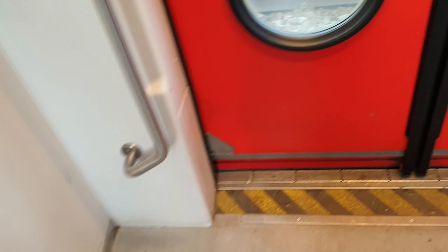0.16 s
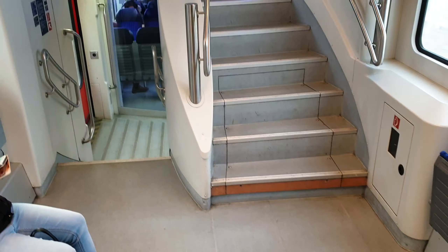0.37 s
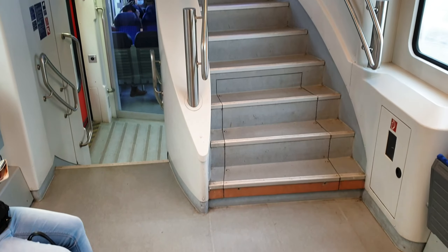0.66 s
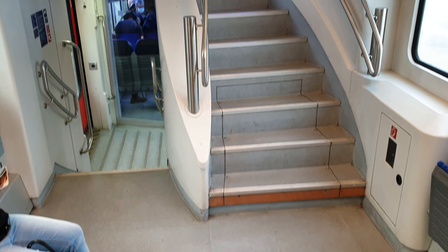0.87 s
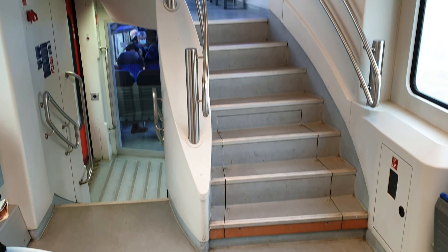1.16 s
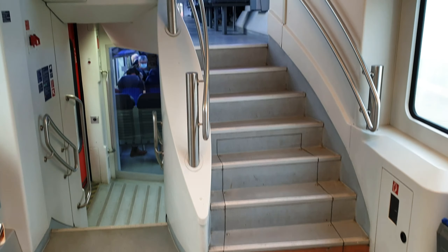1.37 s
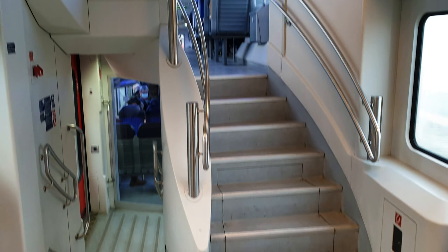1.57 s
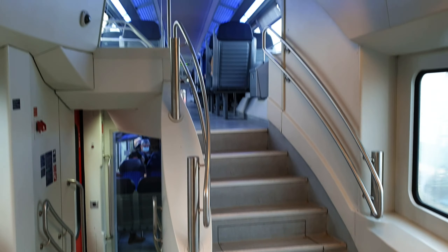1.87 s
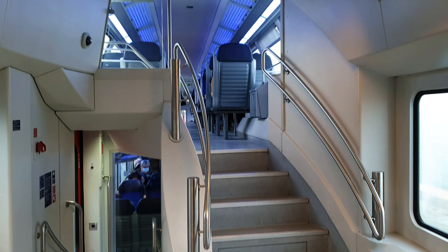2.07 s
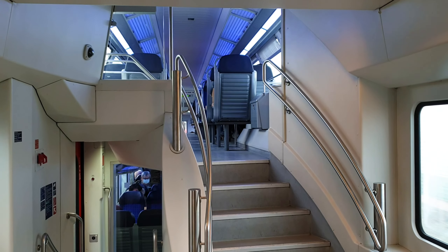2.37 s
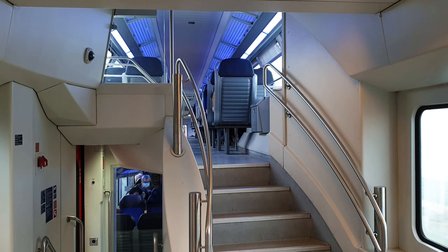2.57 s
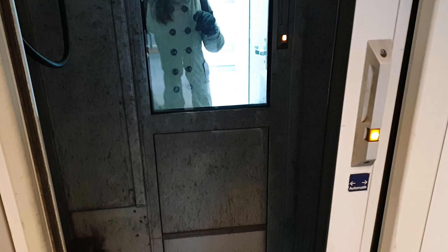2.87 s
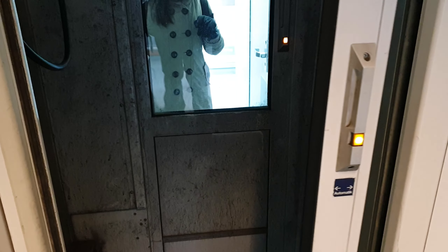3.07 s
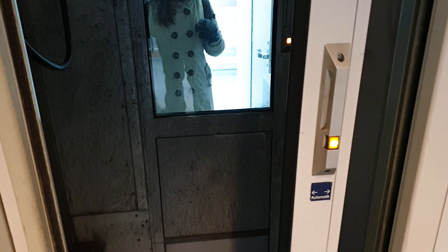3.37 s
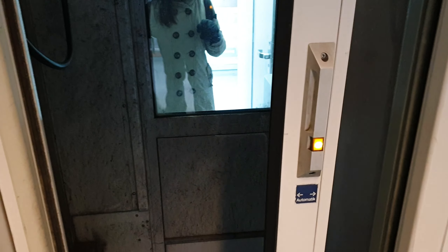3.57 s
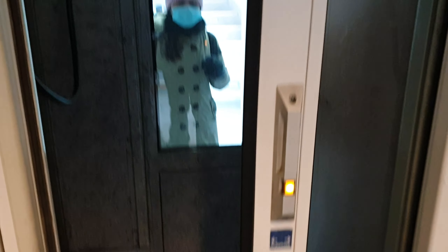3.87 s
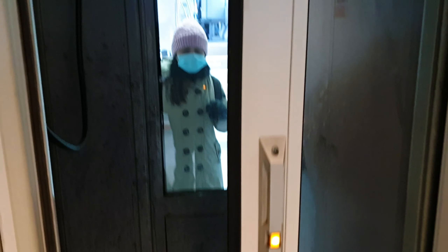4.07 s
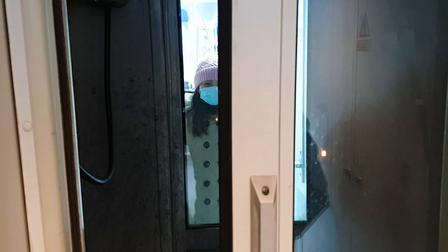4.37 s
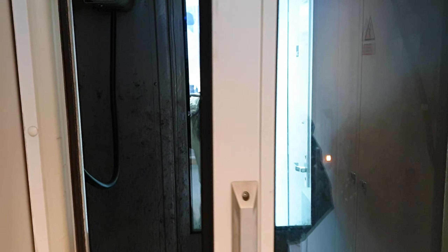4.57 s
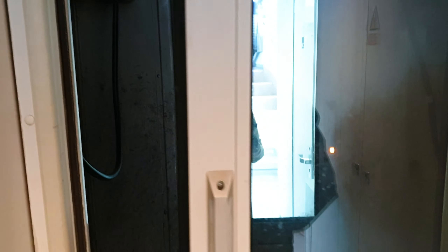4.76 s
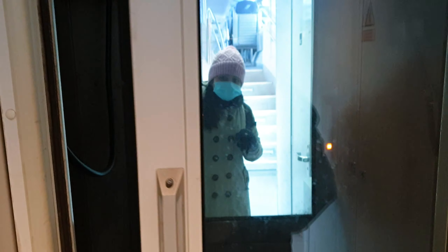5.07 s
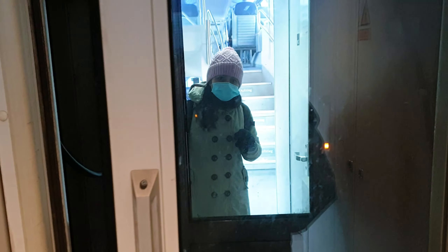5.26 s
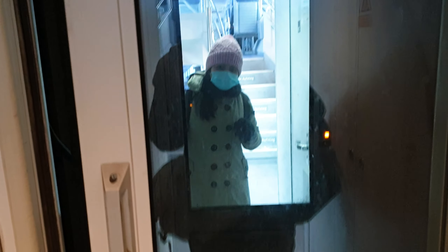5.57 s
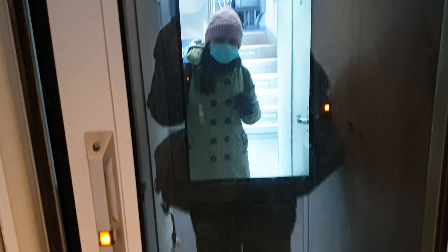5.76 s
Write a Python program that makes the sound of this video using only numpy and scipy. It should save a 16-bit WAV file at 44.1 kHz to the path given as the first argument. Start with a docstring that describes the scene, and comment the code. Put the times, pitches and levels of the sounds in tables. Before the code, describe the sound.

Three train interior sections joined by hard cuts. By the door: dull rumble, quick scuff and cloth brush. By the stairs: subdued bass rumble, steady machine hum, faint buzz and thin very high whine. By the gangway: sudden strong wheel roar with fast low beating, hollow singing resonances and soft thuds; as the sliding door shuts, the roar eases and darkens. Hard-walled small space, handheld stereo pickup.

```python
"""Rolling noise rings in the panels of a passenger coach under way: shaped noise through resonances. It is
heard from three places joined by hard cuts with short silences: by the outer door, at the foot of the stairs,
and at a gangway door that slides open, where narrow noise sings in the air column. Wavering sines make floor
tones and a compressor hum; swelling lines near 14 kHz make a converter whine. Struck resonators and grainy
noise make a shoe scuff; bright noise in strokes makes a coat rustle."""
import sys
import numpy as np
from scipy import signal
from scipy.fft import rfft, irfft, next_fast_len
from scipy.io import wavfile

SR = 44100
rng = np.random.default_rng(int(sys.argv[2]) if len(sys.argv) > 2 else 0)


def ratio(d):
    """dB to gain"""
    e = np.asarray(d, float) / 20
    return 10 ** e


def dump(signal):
    """Clip the signal to [-1, 1] and save it as 16-bit WAV at the path in sys.argv[1]."""
    limited = np.clip(np.atleast_2d(signal).T, -1, 1)
    pcm = np.round(limited * 32767).astype(np.int16)
    wavfile.write(sys.argv[1], SR, pcm)


N = 260631

# stays at door, stairs and gangway: [start t/s, end t/s]
PLACES = [(0, .332), (.370, 2.791), (2.833, 5.91)]
# rolling noise at each place: [t/s, roar level/dB, treble level/dB, of which only the moves are heard]
ROLLING = [
    [(0, -32.5, -15), (.06, -38.5, -2), (.33, -40, 2)],
    [(.37, -35, -15), (.6, -35.5, -15.5), (2.79, -34.5, -13.5)],
    [(2.84, -20, -6.5), (3.65, -22.5, -5.5), (4.25, -19.5, -8), (4.5, -22.5, -6.5), (5.1, -22.5, -10),
     (5.3, -23.5, -10), (5.91, -25, -11)],
]
# colour of the rolling noise at each place, relative density: [f/Hz, level/dB]
DOOR_COLOUR = [(25, 2), (60, -0.5), (120, -6.5), (220, -10), (350, -21), (860, -29.5), (4500, -37),
               (8000, -48.5), (10000, -43), (15400, -49)]
STAIR_COLOUR = [(15, -53), (25, -14), (42, -8), (73, -5.5), (103, -6.5), (192, -11), (231, -13), (293, -19),
                (731, -27), (925, -31), (1140, -33), (1520, -33), (2700, -39.5), (10300, -61), (13000, -95)]
GANGWAY_COLOUR = [(15, -31), (25, -13), (103, -4.5), (152, -12.5), (257, -14.5), (370, -23.5), (469, -16),
                  (578, -18), (950, -17.5), (1730, -24), (3500, -29), (5780, -33.5), (8120, -47),
                  (10000, -42.5), (13000, -51.5), (14500, -85)]
# panel resonances: [f/Hz, width f/Hz, lift level/dB]
STAIR_PANELS = [(70.5, 15, 1), (133.5, 17, 10), (187, 7.6, 3), (240.4, 29, 8), (344, 28, 1.5),
                (357, 26, 3.5), (1070, 280, -2), (1810, 160, -3), (2110, 230, 2.5), (2740, 98, 4.5),
                (3540, 250, 3.5), (5370, 860, 5)]
GANGWAY_PANELS = [(188.5, 16.5, 6), (249, 26.6, 7.5), (287, 14, 8.6), (326.7, 17, 6.3), (479, 57, 5.3),
                  (738, 8.3, 1.7), (807, 90, 1.5), (996, 97, 5.4), (1375, 145, 7.3), (2017, 170, 4.1),
                  (2253, 43, 5.3), (2660, 21, 5.9), (2810, 240, 6), (3230, 63, 2.9), (3407, 140, 6.2),
                  (4170, 97, 1.8)]
# likeness of the two microphones: [f/Hz, likeness 0-1]
LIKENESS = [(60, 0.93), (170, 1), (300, 0.8), (640, 0.81), (900, 0.75), (1600, 0.34), (2100, 0.17),
            (5000, 0.043)]
# left over right: [f/Hz, level/dB]
LEAN = [(60, 6), (110, 3.5), (200, 6.5), (380, 5.5), (700, 7), (1290, 4.5), (2380, 3), (4400, 4.0),
        (8120, 6), (15000, -11.5)]
# phase by which left leads: [f/Hz, phase/rad]
LEAD = [(40, 0.13), (300, 0.33), (800, 0.95), (1400, 2.06), (2300, 6.07), (3200, 8.68)]
# gangway air resonances: [f/Hz, width f/Hz, before the slide level/dB, after the slide level/dB]
DOORWAY = [(474.2, 22.3, -31.5, -29), (527, 5, -40, -27.5), (649.5, 22, -30, -44), (912, 12.3, -33, -29),
           (970, 12, -32, -29)]
DOOR_OPENS_S, DOOR_SLIDE_S = 5.1, 0.11
# swells of the stair floor: [peak t/s, f/Hz, peak level/dB, width t/s]
BOOMS = [(.72, 151.6, -19, 0.081), (1.02, 151.1, -17, 0.049), (1.2, 154, -22, 0.095),
         (1.33, 149.8, -25, 0.06), (1.49, 154.9, -19, .035), (1.6, 155.6, -19, 0.018),
         (1.79, 149.1, -19, 0.061), (2.1, 151.6, -20.5, 0.12), (2.27, 153.5, -25, .05),
         (2.63, 153, -22.5, 0.15)]
# swells of the gangway plate: [peak t/s, f/Hz, peak level/dB, width t/s]
THUDS = [(3.43, 77, -26.5, .04), (3.75, 64.3, -28, .04), (3.93, 65, -18, 0.019), (4.27, 71, -22, 0.063),
         (4.69, 70.9, -16, 0.13), (5.08, 71.3, -14, 0.051), (5.3, 65.3, -28, 0.11), (5.8, 66.4, -24, 0.1)]
# wavering drone under the stairs
DRONE_HZ, DRONE_DB, DRONE_WAVER_DB = 216.6, -30, 1.5
# the lower of two gangway tones: [t/s, f/Hz]; the upper lies one wheel turn a second higher
PAIR_HZ = [(2.84, 99.2), (3.4, 99.6), (3.85, 99.8), (4.0, 100.6), (4.47, 100.5), (4.75, 101.1),
           (5.08, 101.6), (5.29, 102), (5.45, 102.8), (5.91, 103)]
# strength of the two gangway tones: [t/s, lower level/dB, upper level/dB]
PAIR_LEVELS = [(2.84, -25.5, -28), (3.2, -14, -13.5), (3.55, -19.5, -21.5), (3.75, -18, -22),
               (3.92, -11.5, -17.5), (4.1, -28.5, -27), (4.27, -21, -15), (4.47, -14, -15), (4.8, -23, -19),
               (5.08, -23, -16), (5.33, -23.5, -29.5), (5.5, -22, -23), (5.91, -22, -43)]
WHEEL_TURNS_PER_S = 9.14
THROB_S = 4.466   # the tones come into step here
SHAFT_HZ = 46.684   # compressor shaft speed
# compressor hum at stairs and gangway: [t/s, first order level/dB, second order level/dB]
HUM = [
    [(.37, -25, -23), (.7, -37, -19), (1.9, -34, -17), (2.25, -25, -16), (2.79, -25.5, -15)],
    [(2.84, -18, -18), (3.55, -17, -40), (4.0, -24, -31), (4.25, -29.5, -36), (4.5, -29, -25.5),
     (5.2, -29.5, -22.5), (5.91, -32, -16.5)],
]
# compressor valve buzz by the stairs: [multiple of shaft speed, level/dB]
BUZZ = [(6, -38), (7, -45), (10, -50), (12, -53), (14, -54), (15, -53), (18, -55), (21, -56), (23, -52),
        (24, -47), (25, -50), (26, -52), (29, -63), (31, -61), (32, -62), (35, -62), (36, -63), (37, -63),
        (41, -63), (43, -65), (46, -66), (48, -63), (50, -63)]
# converter lines about fourteen kilohertz: [f/Hz, peak level/dB before the common lift]
WHINE = [(13656, -76), (13756, -62), (13856, -59), (13956, -53), (13968, -60), (14043, -57), (14056, -56),
         (14156, -61), (14256, -63), (14356, -80)]
WHINE_LIFT_DB, WHINE_HISS_DB = 6, -66
# knocks of the shoe by the door: [t/s, strike level/dB]
SCUFF = [(0.208, -19), (0.214, -12.5), (0.221, -22), (0.228, -15)]
# floor plate modes under the knocks: [f/Hz, 60 dB decay t/s, level/dB]
PLATE_MODES = [(194, 0.016, 2.5), (475, 0.013, -14.0), (1790, 0.017, -18.0)]
# drags of the sole: [peak t/s, peak level/dB, rise t/s, fall t/s]
DRAGS = [(0, -30.5, .002, .02), (.2105, -29, .0005, .03), (.27, -39, .03, .15)]
# colour of the drags, relative density: [f/Hz, level/dB]
DRAG_COLOUR = [(200, -32), (450, -1.5), (1000, -1.5), (1900, -4), (3000, -9), (6000, -16), (8000, -26)]
# continuous coat rustle at each place, slowly rising and falling: [t/s, level/dB]
RUSTLE_BED = [
    [(0, -48), (.05, -55.5), (.33, -48.5)],
    [(.37, -77), (1.2, -66), (2.79, -62.5)],
    [(2.84, -44), (2.95, -52), (4.5, -52), (5.1, -55), (5.91, -58.5)],
]
# brushes of the coat: [peak t/s, peak level/dB, rise t/s, fall t/s]
BRUSHES = [(.211, -45.5, .001, 0.074), (.33, -45, 0.049, 0.016), (.85, -64, .03, .05),
           (1.08, -58, 0.048, .02), (1.22, -57, 0.033, 0.084), (1.45, -62, .03, 0.087),
           (1.64, -56, .02, 0.056), (2.05, -59.5, .02, .15), (2.6, -56, 0.091, .04),
           (4.17, -40, 0.051, .04), (4.66, -44.5, .05, 0.08), (4.74, -41.5, .03, 0.041),
           (4.8, -35.5, 0.035, 0.048), (5.0, -36.5, .05, 0.098)]
# colour of the cloth, relative density: [f/Hz, level/dB]
RUSTLE_COLOUR = [(880, -28), (1500, -13), (2700, -1.5), (5000, -1), (8000, -7.5), (10700, -0.5),
                 (15600, -23)]


def rms_one(x):
    """Scales to unit rms."""
    return x / np.sqrt(np.mean(x ** 2) + 1e-20)


def in_time(*tables):
    """Joins curve tables and reads each column, one value a sample."""
    s, *columns = np.transpose(np.concatenate(tables))
    return [np.interp(np.arange(N) / SR, s, c) for c in columns]


def at_hz(points, hz):
    """Reads a spectrum on a log-frequency axis."""
    f, value = np.array(points).T
    return np.interp(np.log(hz), np.log(f), value)


def heard_at(*places):
    """1 while the listener stands at one of these places, else 0."""
    t = np.arange(N) / SR
    return sum((t >= PLACES[p][0]) & (t < PLACES[p][1]) for p in places)


def drift(rate_hz, size=N):
    """Slow chance of unit rms: noise smoothed twice at one value per 64 samples, then joined by lines."""
    r = np.exp(-128 * np.pi * rate_hz / SR)
    noise = rng.standard_normal(size // 64 + 2002)
    slow = signal.lfilter([1], [1, -2 * r, r * r], noise)[2000:]   # past the run-in
    return np.interp(np.arange(size) / 64, np.arange(len(slow)), rms_one(slow))


def swells(rows):
    """Sum of bumps that rise and fall exponentially about their peaks."""
    t = np.arange(N) / SR
    return sum(ratio(db) * np.exp(np.minimum((t - s) / rise, (s - t) / fall)) for s, db, rise, fall in rows)


def two_ports(hz):
    """Complex gains of the left and right microphone for a sound field at this frequency."""
    side = np.array([[.5], [-.5]])
    return ratio(side * at_hz(LEAN, hz)) * np.exp(1j * side * at_hz(LEAD, hz))


def partly_alike(shared, own, hz):
    """Mixes two noises into a stereo pair as alike as the microphones hear it."""
    alike = np.clip(at_hz(LIKENESS, hz), 0, 1)
    return np.sqrt(1 + alike) * shared + np.sqrt(1 - alike) * own * [[1], [-1]]


def field(size, colour, panels, band_hz, patchy_db, ripple_db=4.0, bright_db=0):
    """Stereo noise through resonances in flickering half-octaves; before the flicker, band_hz has mid rms 1."""
    fft_size = next_fast_len(size)
    hz = np.maximum(np.fft.rfftfreq(fft_size, 1 / SR), 1)
    lifts_db = sum(lift / (1 + (2 * (hz - f) / width) ** 2) for f, width, lift in panels)
    shape_db = at_hz(colour, hz) + lifts_db
    # the hard-walled vestibule adds dense standing waves above its lowest modes
    ripple = np.interp(hz / 22.0, np.arange(2000), rng.standard_normal(2000))
    shape_db = shape_db + ripple_db * ripple * np.clip(hz / 800, 0, 1)
    shape_db = shape_db - 10 * np.log10(1 + (34 / hz) ** 8)   # the microphones lose the deepest bass
    shared, own = rfft(rng.standard_normal((2, fft_size)))
    spectrum = ratio(shape_db) * two_ports(hz) * partly_alike(shared, own, hz)
    inside = (hz > band_hz[0]) & (hz < band_hz[1])
    mid = irfft(spectrum.mean(axis=0) * inside, fft_size)
    scale = np.sqrt(np.mean(mid ** 2))
    out, together = 0, drift(11.5, size)
    octave = np.log2(hz / 20)
    for centre in np.arange(0, 10.5, .5):
        band = np.clip(1 - 2 * np.abs(octave - centre), 0, 1)
        treble = np.clip(centre - 6.0, 0, 1)   # share of the brightness change felt by this band
        flicker_db = patchy_db * (0.84 * together + drift(3.0, size))
        gain = ratio(flicker_db + treble * bright_db)
        out = out + gain * irfft(spectrum * band, fft_size)[:, :size]
    return out / scale


def rolling():
    """Wheel on rail through the body; each place has its own colour and panels, door gaps let in treble."""
    out = np.zeros((2, N))
    roar_db, treble_db = in_time(*ROLLING)
    looks = [(DOOR_COLOUR, []), (STAIR_COLOUR, STAIR_PANELS), (GANGWAY_COLOUR, GANGWAY_PANELS)]
    for (start, end), (colour, panels) in zip(PLACES, looks):
        a, b = int(start * SR), min(int(end * SR), N)
        bright_db = treble_db[a:b] - treble_db[a:b].mean()
        out[:, a:b] = field(b - a, colour, panels, (300, 1600), patchy_db=0.63,
                            ripple_db=1.3, bright_db=bright_db)
    return out * ratio(roar_db)


def singing(hz, level_db, width_hz):
    """Noise in a narrow resonance: a sine whose size and phase wander, partly apart at the microphones."""
    shared, own = [drift(width_hz) + 1j * drift(width_hz) for _ in range(2)]
    size = partly_alike(shared, own, np.mean(hz))
    turning = np.exp(2j * np.pi * np.cumsum(hz * np.ones(N)) / SR)
    return ratio(level_db) * np.real(two_ports(np.mean(hz)) * size * turning) / np.sqrt(2)


def doorway():
    """Rolling noise sings in the air column of the gangway; the balance shifts as the door opens."""
    opened = 1 / (1 + np.exp((DOOR_OPENS_S - np.arange(N) / SR) / DOOR_SLIDE_S))
    out = 0
    for hz, width_hz, before_db, after_db in DOORWAY:
        out = out + singing(hz, before_db + (after_db - before_db) * opened, width_hz)
    return out * heard_at(2)


def tone(hz, level_db, waver_hz=0.0, waver_rate=4.7):
    """A sine of given rms and wavering pitch at both microphones; it crests at the throb, bar their phase."""
    turns = np.cumsum(hz + waver_hz * drift(waver_rate)) / SR
    turning = np.exp(2j * np.pi * (turns - turns[int(THROB_S * SR)]))
    return np.sqrt(2) * ratio(level_db) * np.real(two_ports(np.mean(hz)) * turning)


def booming(rows, waver_hz, waver_rate):
    """A floor tone that swells in bell-shaped surges, its pitch gliding from one to the next."""
    t = np.arange(N) / SR
    hz, = in_time([row[:2] for row in rows])
    power = sum((ratio(db) * np.exp(-.5 * ((t - s) / width) ** 2)) ** 2 for s, _, db, width in rows)
    return np.sqrt(power) * tone(hz, 0, waver_hz, waver_rate)


def floor_tones():
    """Low tones of wheels and floor; the close ones at the gangway beat some nine times a second."""
    drone = tone(DRONE_HZ, DRONE_DB + DRONE_WAVER_DB * drift(2.4))
    stairs = booming(BOOMS, waver_hz=1.3, waver_rate=7.0) + drone
    hz, = in_time(PAIR_HZ)
    lower_db, upper_db = in_time(PAIR_LEVELS)
    pair = tone(hz, lower_db) + tone(hz + WHEEL_TURNS_PER_S, upper_db)
    gangway = pair + booming(THUDS, waver_hz=3.1, waver_rate=6.8)
    return stairs * heard_at(1) + gangway * heard_at(2)


def compressor():
    """Orders of the shaft; the high ones show only by the quiet stairs, nearly in step, as pulses."""
    first_db, second_db = in_time(*HUM)
    first = tone(SHAFT_HZ, first_db + 1.6 * drift(2.8), waver_hz=0.47)
    hum = first + tone(2 * SHAFT_HZ, second_db)
    buzz = 0
    for order, level_db in BUZZ:
        line = tone(order * SHAFT_HZ, level_db + 1.2 * drift(1.0))
        buzz = buzz + np.roll(line, rng.integers(0, 9), axis=1)   # up to 8 samples out of step
    return hum * heard_at(1, 2) + buzz * heard_at(1)


def converter():
    """Standing waves are short up here: each line swells and fades on its own at each microphone."""
    t = np.arange(N) / SR
    out = singing(14000, WHINE_HISS_DB, 200.0)
    restless = heard_at(2)   # the lines flutter faster at the gangway
    for hz, level_db in WHINE:
        for side in range(2):
            swell_db = 1.6 * drift(0.74) + 3.1 * restless * drift(9.0)
            wander_turns = 0.095 * drift(1.0) + 0.1 * restless * drift(6.5)
            sine = np.sin(2 * np.pi * (hz * t + rng.random() + wander_turns))
            out[side] += ratio(level_db + WHINE_LIFT_DB + swell_db) * sine
    return out * heard_at(1, 2)


def scuff():
    """Soft knocks ring the floor plate briefly, and the sole drags with an uneven grain."""
    clicks = np.zeros(N)
    clicks[[int(s * SR) for s, _ in SCUFF]] = ratio([strike_db for _, strike_db in SCUFF])
    knocks = 0
    for hz, t60, level_db in PLATE_MODES:
        r, w = ratio(-60 / (t60 * SR)), 2 * np.pi * hz / SR
        ring = signal.lfilter([0, np.sin(w)], [1, -2 * r * np.cos(w), r * r], clicks + 1e-18)
        knocks = knocks + ratio(level_db) * ring
    out = knocks * ratio([[2.0], [-2.5]])   # leans left
    size = int(PLACES[0][1] * SR)
    grain = swells(DRAGS)[:size] * ratio(2.4 * drift(70.0, size))
    out[:, :size] += grain * field(size, DRAG_COLOUR, [], (300, 7000), patchy_db=0.5)
    return out


def rustle():
    """Cloth rubbing: bright noise roughened by fast grain, a slowly rising and falling bed under brushes."""
    grain = ratio(1.0 * drift(40.0))
    cloth = field(N, RUSTLE_COLOUR, [], (8500, 13000), patchy_db=0.96)
    bed_db, = in_time(*RUSTLE_BED)
    return np.hypot(ratio(bed_db), swells(BRUSHES)) * grain * cloth


def scene():
    """All sources, silent between the places."""
    body = rolling() + doorway() + floor_tones()
    machines = compressor() + converter()
    return (body + machines + scuff() + rustle()) * heard_at(0, 1, 2)


def roll_off(x):
    """The treble ends steeply here."""
    return signal.sosfilt(signal.butter(12, 15700, fs=SR, output="sos"), x)


def record(dry):
    """Rounds the loudest peaks with a soft curve."""
    mix = 1.219 * np.tanh(dry / 1.294)
    return roll_off(mix)


dry = scene()
out = record(dry)
dump(out)
```